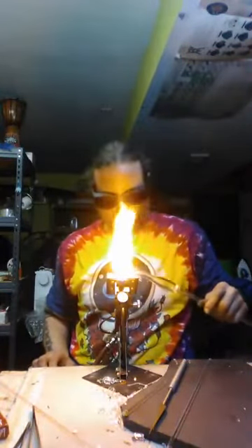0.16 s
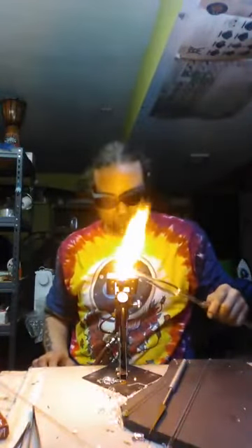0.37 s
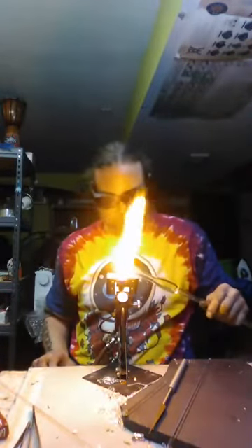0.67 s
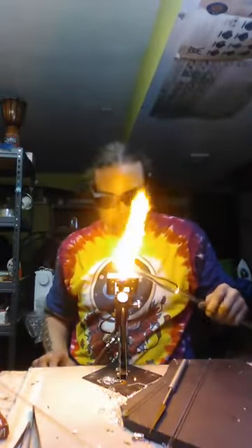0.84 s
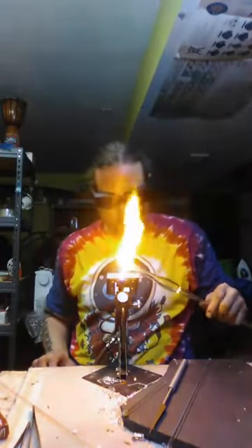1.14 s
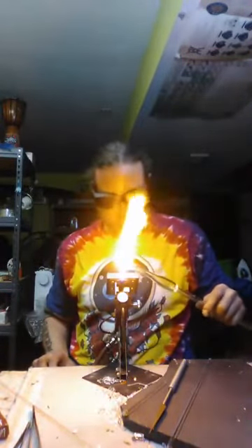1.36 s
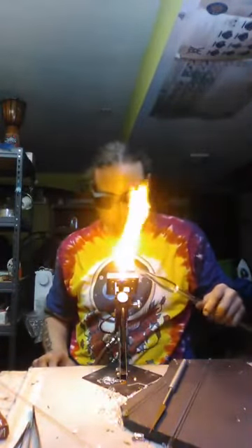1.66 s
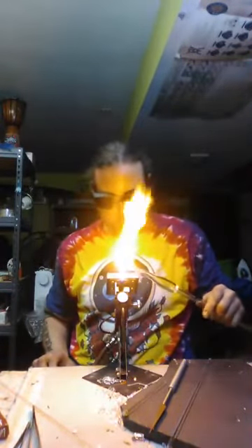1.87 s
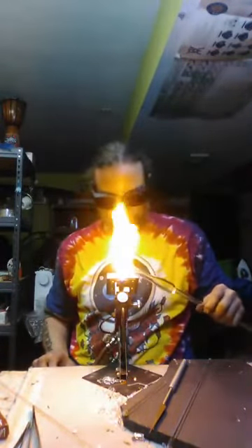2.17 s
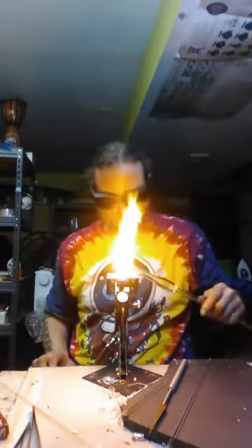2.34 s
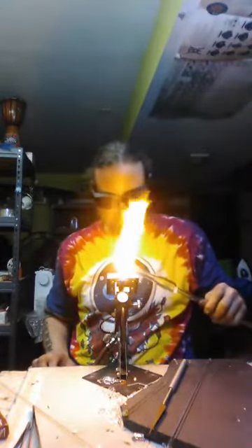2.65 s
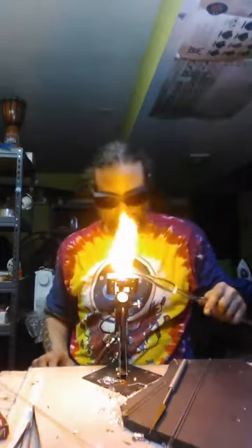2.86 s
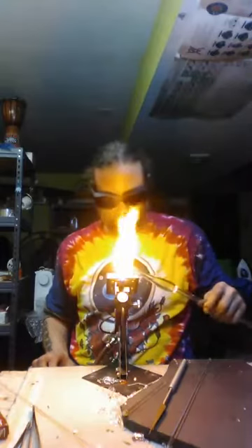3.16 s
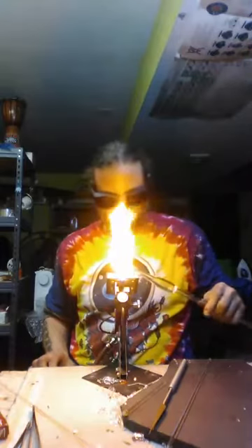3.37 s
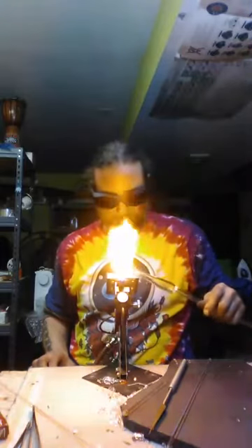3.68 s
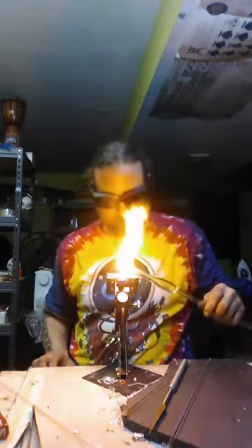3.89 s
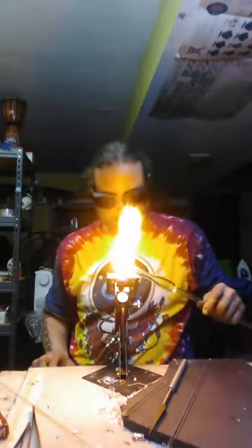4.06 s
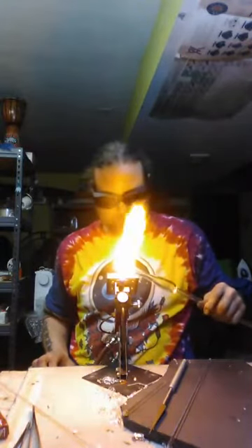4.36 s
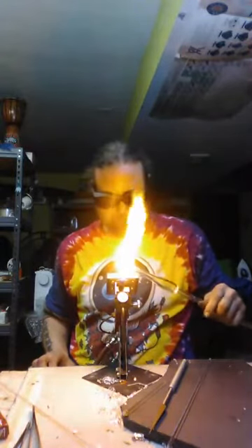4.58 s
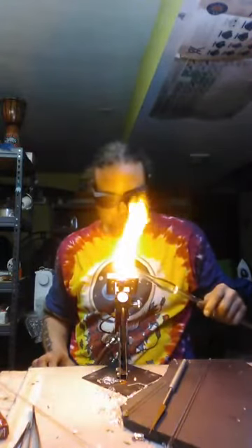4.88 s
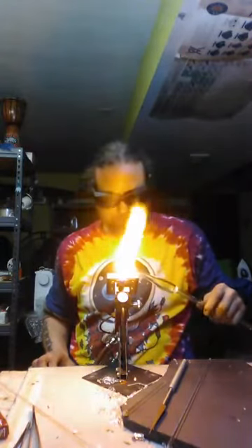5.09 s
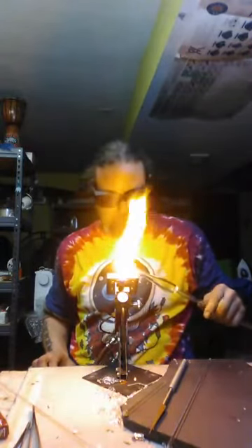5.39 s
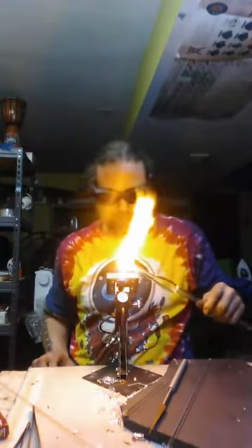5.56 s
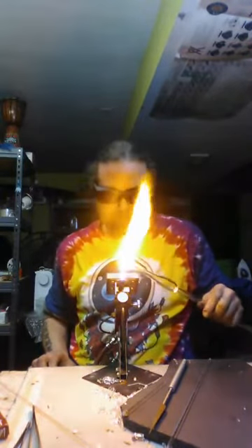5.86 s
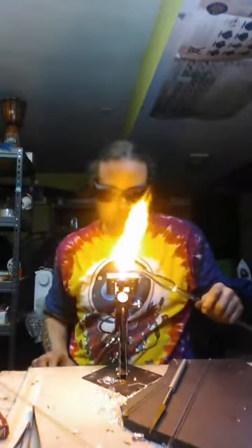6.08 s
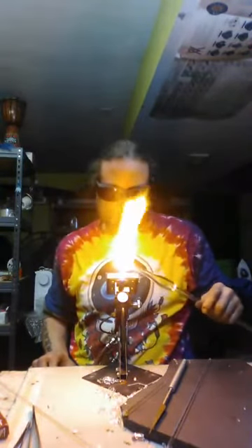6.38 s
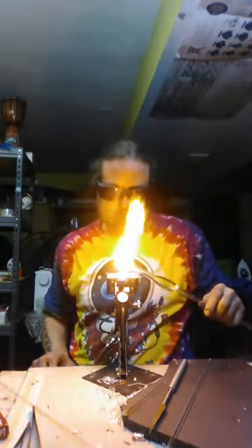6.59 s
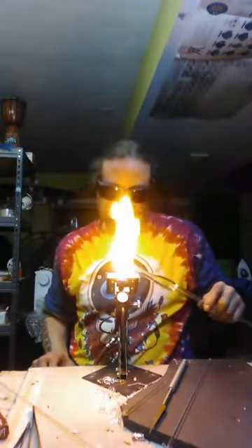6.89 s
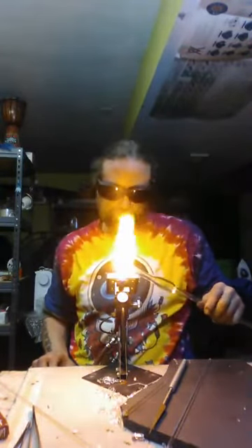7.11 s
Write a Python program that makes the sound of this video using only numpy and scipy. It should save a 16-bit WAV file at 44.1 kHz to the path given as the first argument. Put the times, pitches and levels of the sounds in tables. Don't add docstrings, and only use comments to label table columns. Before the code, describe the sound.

Close to the bench, gas rushes from a burner as dense, nearly constant hiss, with a soft low flame flutter and machine hum beneath. Small breathy licks barely rise above it. Late on, a valve puffs a short airy spurt with one quick wall reflection; moments later everything drops out for a fraction of a second, then the same hiss snaps back. Thin, identical on both sides, with dull extreme highs.

```python
import sys
import numpy as np
from scipy import signal
from scipy.fft import rfft, irfft, next_fast_len
from scipy.io import wavfile
from scipy.ndimage import uniform_filter1d

SR = 44100
rng = np.random.default_rng(int(sys.argv[2]) if len(sys.argv) > 2 else 0)


def nominal_scale(level):
    x = np.asarray(level, float) / 20
    return 10 ** x


def materialize(psi):
    bounded = np.clip(np.atleast_2d(psi).T, -1, 1)
    quanta = np.round(bounded * 32767).astype(np.int16)
    wavfile.write(sys.argv[1], SR, quanta)


N = 319284


def rms_one(x):
    return x / np.sqrt(np.mean(x ** 2) + 1e-20)


def at_hz(points, hz):
    point_hz, point_db = np.array(points).T
    return np.interp(np.log(hz + 1), np.log(point_hz), point_db)


def drift(rate_hz):
    hop = 40
    r = np.exp(-2 * np.pi * rate_hz * hop / SR)
    slow = signal.lfilter([1], [1, -2 * r, r * r], rng.standard_normal(N // hop + 2002))
    slow = slow[2000:]
    return np.interp(np.arange(N) / hop, np.arange(len(slow)), rms_one(slow - slow.mean()))


def resonate(x, hz, width_hz):
    r = np.exp(-np.pi * width_hz / SR)
    poles = [1, -2 * r * np.cos(2 * np.pi * hz / SR), r * r]
    return signal.lfilter([(1 - r * r) / 2, 0, (r * r - 1) / 2], poles, x)


def ring(x, hz, width_hz):
    return rms_one(resonate(resonate(x, hz, width_hz), hz, width_hz))


def turbulence(colour_db, shared_db, own_db, rate_hz, count):
    size = next_fast_len(N)
    hz = np.arange(size // 2 + 1) * SR / size
    whole = rfft(rng.standard_normal(size)) * nominal_scale(colour_db(hz))
    place = np.log(hz / 40 + 1) / np.log(SR / 80) * count
    together = drift(rate_hz)
    out = 0
    for k in range(count + 1):
        band = irfft(whole * np.clip(1 - abs(place - k), 0, 1), size)[:N]
        out = out + band * nominal_scale(shared_db * together + own_db * drift(rate_hz * 2))
    return rms_one(out)


def walls(x, echo_db, last_s, count):
    out = x.copy()
    for distance, sign in zip(rng.random(count), rng.choice([-1, 1], count)):
        lag = int((.003 + last_s * distance) * SR)
        out[lag:] += sign * nominal_scale(echo_db - 6 * distance) * x[:-lag]
    return rms_one(out)


def jet(level_db):
    # hz, density_db (per Hz)
    jet_colour = [(1300, -12.8), (1640, -9.5), (1760, -4.0), (2700, -2.4), (4300, -13.7), (4500, -7.5),
                  (5200, -8.6), (5400, -1.4), (6300, -5.5), (8300, -5.5), (9100, 0.0), (10600, -4.8),
                  (12900, -11.0), (13900, -8.2)]
    # centre_hz, width_hz, height_db
    surroundings = [(1348, 39, -1.8), (1423, 133, 3.5), (1691, 92, -3.4), (1737, 77, 3.7), (2072, 93, 5.3),
                    (2199, 90, -3.3), (2324, 127, -5.8), (2440, 101, -3.6), (2650, 55, 2.1), (2853, 168, -5.0),
                    (2941, 85, 2.3), (3002, 55, -2.9), (3153, 279, -7.5), (3200, 140, 6.3), (3510, 271, 3.4),
                    (3770, 60, -3.1), (3844, 62, -5.3), (3906, 39, 4.0), (4008, 70, 2.0), (4131, 82, -4.0),
                    (4229, 399, 3.5), (4272, 91, -7.4), (4378, 116, -5.8), (4876, 54, 4.0), (5267, 131, -2.9),
                    (5462, 118, -4.2), (5515, 111, 3.0), (5676, 231, -4.2),
                    (5735, 78, 5.1), (6052, 317, 3.1), (6129, 86, -5.3), (6317, 125, -3.5), (6585, 212, 1.7),
               (6687, 155, -3.4), (7228, 62, -3.2), (7355, 57, -4.5), (7536, 190, -3.2), (7935, 52, 4.1),
               (8759, 153, 4.1), (9050, 221, 3.7), (9497, 135, -3.2), (9895, 48, -5.1), (10056, 158, -4.6),
               (10233, 71, -4.0), (10434, 91, 3.3), (10627, 129, 5.7), (10865, 328, -5.2),
               (11078, 39, -5.4), (11132, 401, 2.8), (11393, 91, 2.7), (11557, 84, 3.7), (11821, 123, -2.9),
               (12408, 320, 5.5), (12696, 180, 3.4), (12912, 401, -3.3), (13197, 161, -5.3)]

    def colour_db(hz):
        total_db = at_hz([(800, -57)] + jet_colour, hz)
        for centre, width, height_db in surroundings:
            total_db = total_db + height_db / (1 + (2 * (hz - centre) / width) ** 2) ** 2
        return total_db

    hiss = turbulence(colour_db, shared_db=0.08, own_db=1.18, rate_hz=7.2, count=16)
    return nominal_scale(level_db) * walls(hiss, echo_db=-17, last_s=.016, count=12)


def flame(level_db):
    # hz, density_db (per Hz)
    roar_colour = [(18, -11), (45, 2.5), (60, 2), (110, 7.5), (160, 1), (200, 2), (320, -4), (520, -3.5),
                   (800, -3), (1200, -6), (1600, -36), (2200, -17.5)]
    roar = turbulence(lambda hz: at_hz(roar_colour, hz), shared_db=1.0, own_db=2.7, rate_hz=9.2, count=13)
    return nominal_scale(level_db) * roar


def licks():
    # peak_s, centre_hz, length_s, level_db (rms)
    lick_table = [(.2, 1700, 0.14, -47), (1.1, 420, 0.12, -50.5), (1.25, 320, 0.15, -51),
                  (2.13, 600, 0.046, -48.5), (3.15, 330, 0.056, -52), (4.52, 3000, .06, -44),
                  (4.7, 2000, .06, -48), (4.95, 2000, 0.036, -43), (5.8, 2650, 0.13, -46),
                  (5.91, 600, 0.057, -52.5), (6.75, 450, .05, -51), (6.97, 720, 0.034, -46.5),
                  (7.12, 680, 0.079, -53.5)]
    out = np.zeros(N)
    white = rng.standard_normal(N)
    for peak_s, hz, length_s, level_db in lick_table:
        start, size = int((peak_s - length_s) * SR), int(2 * length_s * SR)
        piece = ring(white[start:start + size], hz, .45 * hz)
        out[start:start + size] += nominal_scale(level_db) * piece * np.hanning(size)
    return out


def spurt(start_s, attack_s, hold_s, release_db_per_s, level_db):
    t = np.arange(N) / SR - start_s
    fall_db = release_db_per_s * np.clip(t - attack_s - hold_s, 0, 1)
    return np.clip(t / attack_s, 0, 1) * nominal_scale(level_db - fall_db)


def puff_tone(modes):
    air = rng.standard_normal(N)
    tone = 0
    for k, (hz, width_hz, db) in enumerate(modes):
        tone = tone + (-1) ** k * nominal_scale(db) * ring(air, hz, width_hz)
    return rms_one(tone)


def valve():
    # centre_hz, width_hz, level_db
    body_modes = [(760, 200, -11), (937, 130, -6), (1250, 200, -4), (1870, 250, 1), (2200, 600, -1),
                  (2900, 900, -2), (4000, 1800, -1)]
    # centre_hz, width_hz, level_db
    outlet_modes = [(5350, 200, 0), (5600, 200, 0), (5950, 500, -3), (4700, 900, -7), (6800, 1200, -7),
                    (8500, 2500, -8)]
    # attack_s, hold_s, release_db_per_s, level_db
    body_spurt = (.009, .011, 2200, -29)
    # attack_s, hold_s, release_db_per_s, level_db
    outlet_spurt = (.007, .03, 230, -31)
    open_s, echo_s, echo_db = 5.985, .024, -8
    body_gain = spurt(open_s, *body_spurt) + nominal_scale(echo_db) * spurt(open_s + echo_s, *body_spurt)
    body = body_gain * puff_tone(body_modes)
    outlet = spurt(open_s, *outlet_spurt) * puff_tone(outlet_modes)
    sputter_db = 1.5 * drift(110)
    return (body + outlet) * nominal_scale(sputter_db)


def machines():
    # hz, level_db (rms)
    tones = [(20.2, -70.2), (73.35, -54.2), (101.6, -59.1), (119.95, -42.2), (137.9, -62.2), (156.8, -64.9),
             (239.9, -65.7), (276.6, -69.9), (366.7, -68.3), (378.2, -71.7), (440.1, -70.9), (458.3, -71.3),
             (479.8, -73.1)]
    # hz, width_hz, level_db (rms)
    wavering = [(60.16, 3.3, -58), (222.4, 1.5, -62.5), (147.3, 5.1, -64.5), (297, 2.5, -78.5),
                (360, 1.9, -97)]
    t = np.arange(N) / SR
    white = rng.standard_normal(N)
    out = np.zeros(N)
    for hz, db in tones:
        sine = np.sin(2 * np.pi * (hz * t + rng.random()))
        out += nominal_scale(db + 0.23 * drift(3.7)) * np.sqrt(2) * sine
    for hz, width_hz, db in wavering:
        out += nominal_scale(db) * ring(white, hz, width_hz)
    return out


def scene():
    # time_s, level_db
    surge = [
        (0, -.2),
        (1, -.2),
        (2, .2),
        (3.3, .2),
        (4, -.2),
        (5, .4),
        (6, 0),
        (6.5, -.8),
        (7.24, -.2),
    ]
    surge_db = np.interp(np.arange(N) / SR, *np.transpose(surge))
    torch = jet(-34.8 + surge_db) + flame(-48.2 + 1.2 * surge_db)
    mono = torch + licks() + valve() + machines()
    return np.array([mono, mono])


def starve(x, wander_db):
    # hz, threshold_db
    lost_below = [(1000, -40), (1300, -13), (2200, -7.5), (3000, -6), (3700, -4.5), (4300, -5.5),
                  (5200, -7), (6500, -10), (9500, -10), (11000, -9), (12000, -7), (13000, -5), (13800, -6)]
    hz, _, z = signal.stft(x, SR, nperseg=2048, noverlap=1536)
    power = abs(z) ** 2
    sliver = uniform_filter1d(uniform_filter1d(power, size=3, axis=0), size=4, axis=1)
    masker = uniform_filter1d(np.median(power, axis=1), size=70)[:, None] / np.log(2)
    wander = uniform_filter1d(rng.standard_normal(z.shape), size=12, axis=0)
    wander = rms_one(uniform_filter1d(wander, size=3, axis=1))
    threshold_db = at_hz(lost_below, hz)[:, None] + wander_db * wander
    keep = sliver > masker * nominal_scale(threshold_db) ** 2
    kept = z * np.where(keep, 1, .01)
    makeup = np.mean(power, axis=1) / np.mean(abs(kept) ** 2 + 1e-20, axis=1)
    kept = kept * np.sqrt(np.minimum(makeup, 2))[:, None]
    return signal.istft(kept, SR, nperseg=2048, noverlap=1536)[1][:N]


def dropout():
    drop_s, drop_fade_s = 6.1362, .006
    return_s, return_fade_s = 6.2682, .0003
    t = np.arange(N) / SR
    return np.clip(np.maximum((drop_s - t) / drop_fade_s, (t - return_s) / return_fade_s), 0, 1)


def band_limit(x):
    return signal.sosfilt(signal.butter(12, 13975, fs=SR, output="sos"), x)


def record(dry):
    thin = starve(dry[0], wander_db=2.6) * dropout()
    return band_limit(np.array([thin, thin]))


dry = scene()
out = record(dry)
materialize(out)
```